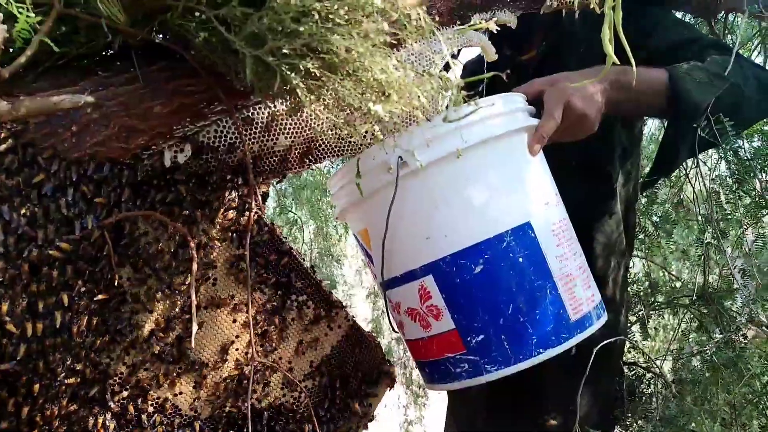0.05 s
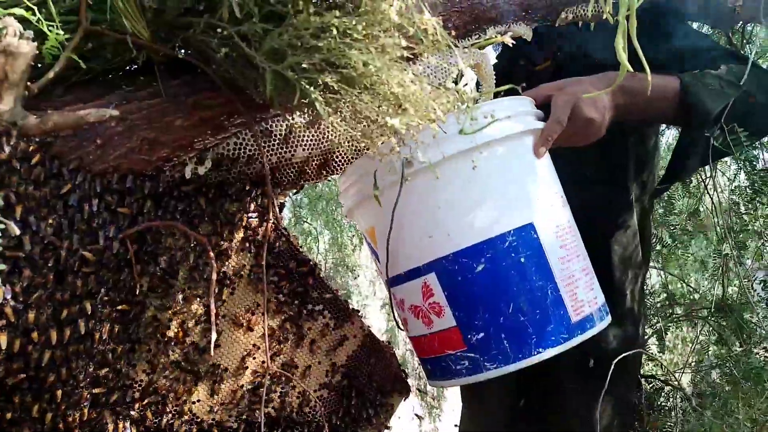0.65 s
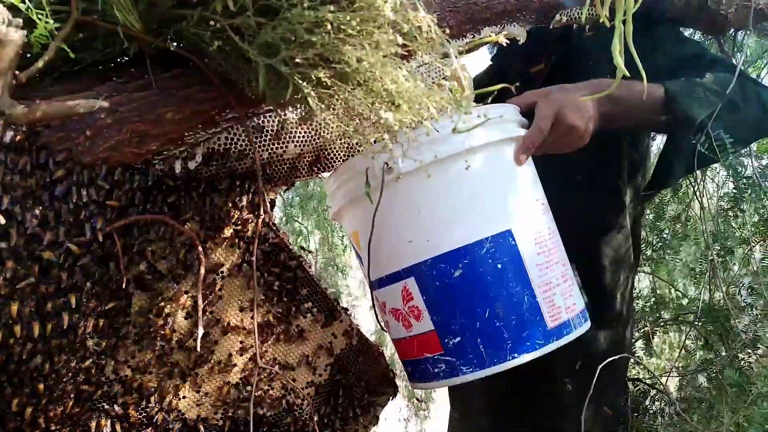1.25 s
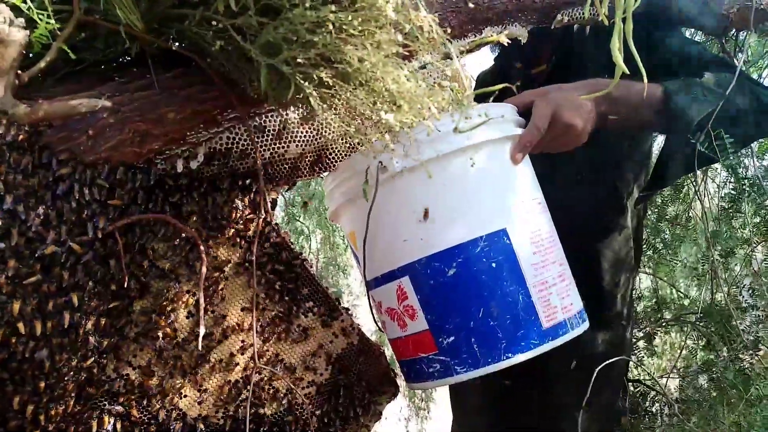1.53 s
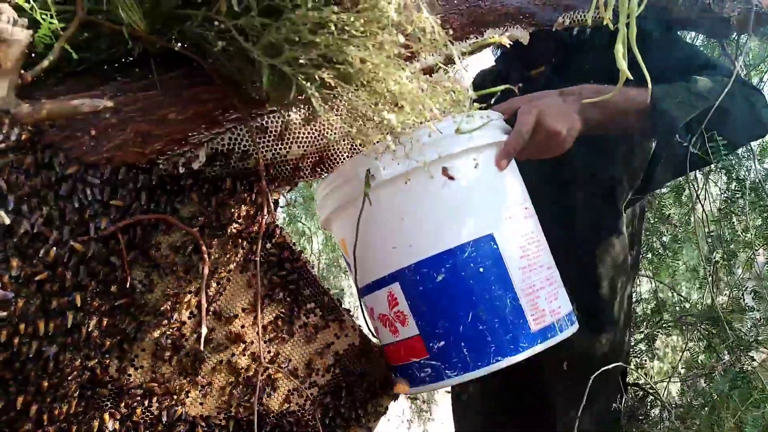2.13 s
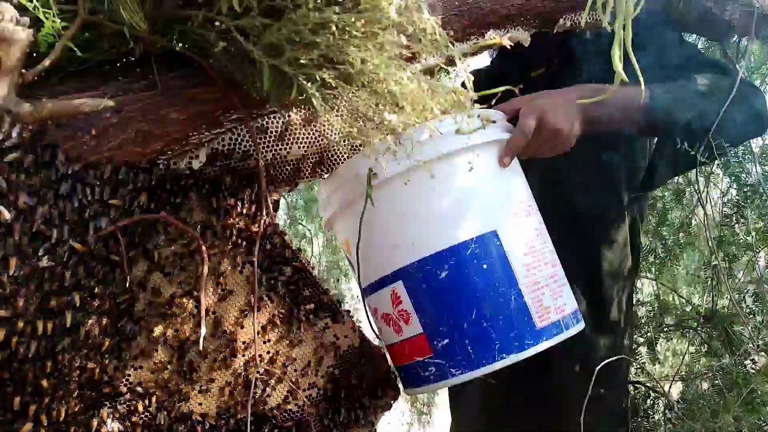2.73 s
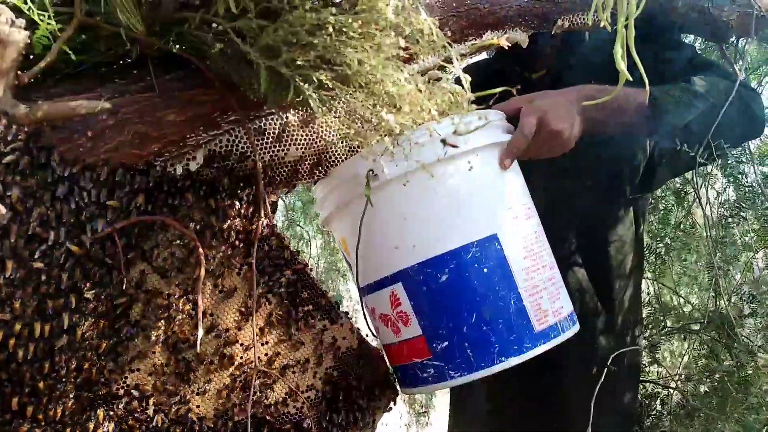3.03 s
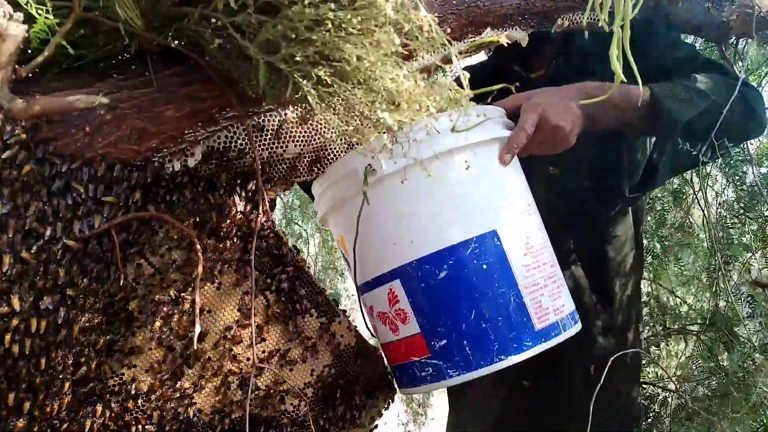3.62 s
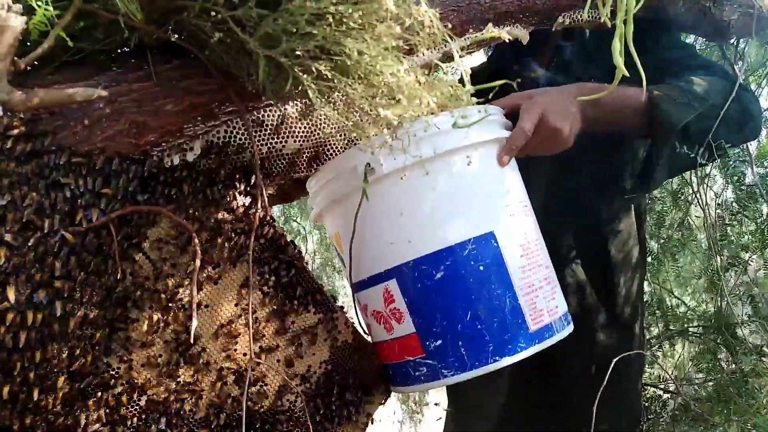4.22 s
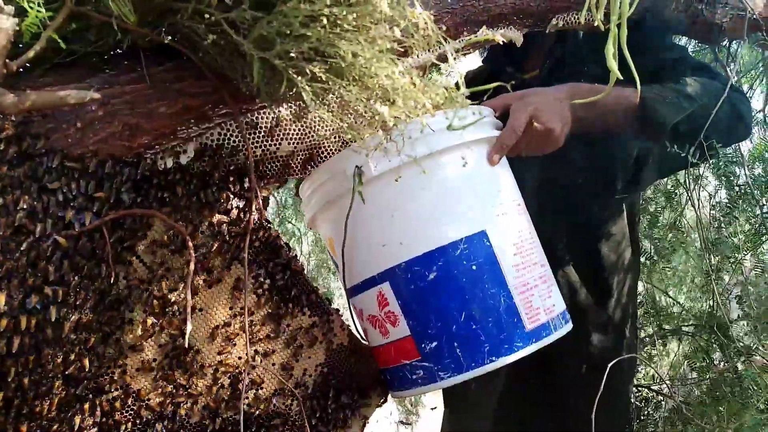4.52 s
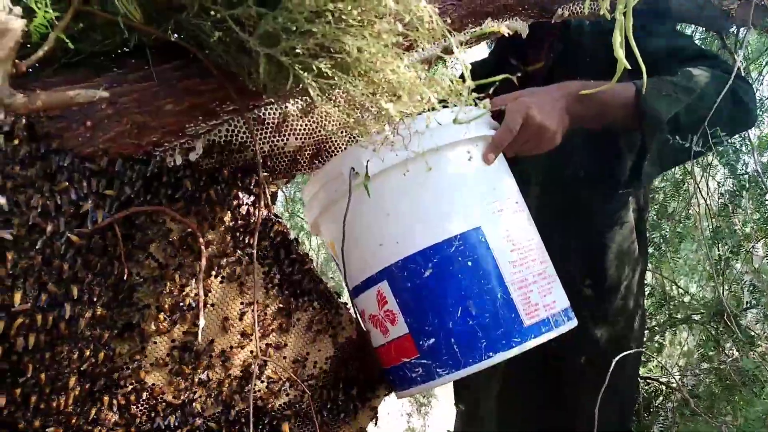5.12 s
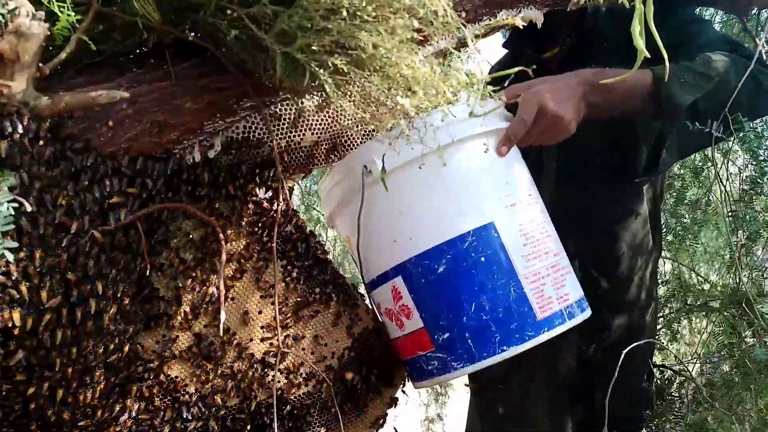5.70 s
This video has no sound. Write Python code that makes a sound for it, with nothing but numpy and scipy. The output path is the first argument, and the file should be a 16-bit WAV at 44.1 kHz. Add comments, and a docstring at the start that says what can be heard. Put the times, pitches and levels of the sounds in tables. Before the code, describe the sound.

Countless bees drone together near the microphone in the open air, a deep hum that fades back and then surges as the colony is stirred. Behind it are lumpy wind rumble on the microphone and a faint, ticking leafy hiss. Tiny twig cracks come now and then. Later a plastic bucket gives light scuffs and two soft knocks on a branch, and the hum eases while leaves rustle.

```python
"""Outdoors at a wild bee colony on a hanging comb, with a plastic bucket held up to it.
Countless wings merge into a low roar that surges and sinks as the bees are stirred.
Behind it, wind rumbles on the microphone, and leaves and crawling bees make a fine hiss.
Dry twigs snap now and then, and the bucket scuffs and knocks softly against the branch."""
import sys
import numpy as np
from scipy import signal
from scipy.fft import rfft, irfft, next_fast_len
from scipy.io import wavfile
from scipy.ndimage import uniform_filter1d, map_coordinates

SR = 44100
rng = np.random.default_rng(int(sys.argv[2]) if len(sys.argv) > 2 else 0)


def master_out(mix):
    """Clip the mix to full scale and print it as 16-bit PCM to the path in sys.argv[1]."""
    frames = np.transpose(np.atleast_2d(mix))
    ceiling = np.clip(frames, -1, 1)
    pcm = np.round(ceiling * 32767).astype(np.int16)
    wavfile.write(sys.argv[1], SR, pcm)


N = 258426

# how stirred the colony is, as the level of its hum: (time [s], level [dB])
COLONY_STIR = [(0, -44.5), (0.31, -44.5), (0.64, -50.5), (0.85, -60), (1.45, -57.5), (1.65, -57.5),
               (1.95, -53), (2.2, -51.5), (2.55, -52.5), (2.85, -55), (3.25, -50.5), (3.5, -45.5),
               (3.87, -45), (4.08, -39.5), (4.3, -41.5), (4.48, -44.5), (4.68, -42.5), (5.03, -42.5),
               (5.3, -50), (5.6, -51), (5.86, -49.5)]


def amp(db):
    """Decibels to gain."""
    return 10 ** (np.asarray(db) / 20)


def unit(x):
    """Scale to rms 1."""
    return x / np.sqrt(np.mean(x ** 2) + 1e-20)


def along(points, hz):
    """Read (frequency, value) points on a log frequency axis."""
    freqs, values = np.transpose(points)
    return np.interp(np.log(hz + 1), np.log(freqs + 1), values)


def fader(points):
    """Join (time, value) points into one value per sample."""
    times, values = np.transpose(points)
    return np.interp(np.arange(N) / SR, times, values)


def swell(middle_s, length_s):
    """A bell-shaped rise and fall with peak 1."""
    return np.exp(-(2 * (np.arange(N) / SR - middle_s) / length_s) ** 2)


def wobble(rate):
    """A smooth random curve, rate knots a second."""
    knots = rng.standard_normal(int(N * rate / SR) + 4)
    coarse = np.arange(0, N + 64, 64)
    return np.interp(np.arange(N), coarse, map_coordinates(knots, [coarse * rate / SR]))


def filtered(x, response):
    """Filter x by a gain given as a function of frequency."""
    n = x.shape[-1]
    padded = next_fast_len(n + 8192)
    return irfft(rfft(x, padded) * response(np.fft.rfftfreq(padded, 1 / SR)), padded)[..., :n]


def resonance(hz, centre, width):
    """A causal resonance with peak gain 1."""
    return 1j * hz * width / (centre ** 2 - hz ** 2 + 1j * hz * width)


def below(hz, edge_hz):
    """A steep low-pass gain."""
    return 1 / np.sqrt(1 + (hz / edge_hz) ** 16)


def panned(pan_db):
    """Stereo gains; pan is left minus right in dB."""
    return amp(np.array([[pan_db], [-pan_db]]) / 2)


def from_left(x, lead_s):
    """Sound from the left reaches the left microphone port first."""
    return filtered(x, lambda hz: np.exp(1j * np.pi * hz * lead_s * np.array([[1], [-1]])))


def add(out, start_s, sound):
    """Mix a sound in at its start time."""
    part = out[..., round(start_s * SR):][..., :sound.shape[-1]]
    part += sound[..., :part.shape[-1]]


def rush(spectrum, correlation, patchy_db):
    """Coloured stereo noise of rms 1, its gain mottled over time and frequency."""
    grid = signal.stft(rng.standard_normal((2, N)), nperseg=512)[2]
    patches = uniform_filter1d(rng.standard_normal(grid.shape[1:]), size=8, axis=0)
    patches = unit(uniform_filter1d(patches, size=12, axis=1))
    pair = signal.istft(grid * amp(patchy_db * patches), nperseg=512)[1][:, :N]
    spread = lambda hz: np.arccos(np.clip(along(correlation, hz), -1, 1)) / 2
    colour = lambda hz: amp(along(spectrum, hz)) * [np.cos(spread(hz)), np.sin(spread(hz))]
    mid, side = filtered(pair, colour)
    return unit(np.array([mid + side, mid - side]))


def breeze(wind_db, lumps_db, air_db):
    """Lumpy wind rumble, a little different at each port, over the steady murmur of open air."""
    # wind on the microphone: (frequency [Hz], level [dB])
    wind_spectrum = [(8, 3.5), (20, 1), (45, 1.5), (75, 5.5), (110, -7), (250, -47.5)]
    # puffs of wind: (middle [s], length [s], boost [dB])
    puffs = [(1.35, 0.14, 9.5), (1.8, 0.34, 2.5), (2.31, 0.13, 11), (2.52, 0.064, 13), (5.79, 0.1, 4)]
    # bed of open air: (frequency [Hz], level [dB])
    air_spectrum = [(30, -14), (70, -4.5), (140, -7), (250, -11.5), (450, -19.5), (700, -17), (1000, -23.5),
                    (1600, -30.5), (2500, -38.5), (5000, -94)]
    # its stereo image: (frequency [Hz], left-right correlation [0-1])
    air_correlation = [(25, 0.46), (120, 1), (250, 0.96), (450, 0.43), (700, 0.49), (1300, 0)]
    puff_db = sum(db * swell(middle, length) for middle, length, db in puffs)
    gusts = amp(wind_db + puff_db + lumps_db * wobble(3.2))
    wind = gusts * rush(wind_spectrum, correlation=[(20, 0.1), (50, 0.73), (90, 0.76)], patchy_db=4.0)
    air = amp(air_db) * rush(air_spectrum, air_correlation, patchy_db=1.8)
    return wind + from_left(air, lead_s=0.00018)


def rustle(ticks_per_s, tick_db, spread_db):
    """Leaves and crawling bees: a fluttering hiss with tiny ticks, swelling where foliage brushes by."""
    # the bed, nearly steady until the foliage is disturbed: (time [s], relative level [dB])
    bed_levels = [(0, -67), (0.8, -65.5), (1.8, -67), (5.2, -67), (5.5, -62), (5.86, -61.5)]
    # colour of hiss and ticks: (frequency [Hz], level [dB])
    spectrum = [(800, -10), (1400, 0.5), (2000, 0), (3000, -3), (4600, -5), (5700, -4.5), (6600, -0.5),
                (7400, 2), (8300, -8), (9300, -14.5), (11000, -12), (13000, -6.5), (14400, -12)]
    # foliage brushing the bucket: (middle [s], length [s], level [dB])
    brushes = [(0.03, 0.089, -55.5), (1.007, 0.065, -63), (1.157, 0.031, -65), (4.702, 0.026, -60),
               (5.06, 0.019, -65), (5.197, 0.022, -59), (5.395, 0.1, -58), (5.64, 0.08, -58.5)]
    brushing = sum(amp(db) * swell(middle, length) for middle, length, db in brushes)
    envelope = np.hypot(amp(fader(bed_levels) + 3.5), brushing)
    hiss = rush(spectrum, correlation=[(1500, 0.068), (7000, 0), (14000, 0)], patchy_db=1.12)
    flutter = amp(0.75 * wobble(18))
    triggers = (rng.random(N) < ticks_per_s / SR) * amp(spread_db * rng.random(N))
    tick_decay = amp(-60 * np.arange(SR // 20) / SR / 0.016)
    bursts = signal.fftconvolve(triggers, tick_decay)[:N] * rng.standard_normal((2, N))
    ticks = unit(filtered(bursts, lambda hz: amp(along(spectrum, hz))))
    return envelope * (flutter * hiss + amp(tick_db) * ticks)


def twigs(crack_t60, gain_db, tail_t60, tail_db, ring_t60):
    """A twig cracks and rings briefly; close echoes repeat both, and foliage scatters a faint tail."""
    # dry twigs breaking:
    # (time [s], relative level [dB], tilt [dB/octave], ring [Hz], ring over crack [dB], pan [dB])
    snaps = [(1.334, -47, 14, 9800, -14, -1), (1.3377, -44, -13, 3080, -2.5, 2),
             (1.5207, -38.5, 7, 5170, -8.5, 1), (3.3384, -43, 3, 3080, -6, 0),
             (3.92, -26.5, -4, 7320, -2.5, 2), (5.214, -34.5, 22, 12160, -14, 2),
             (5.2168, -43, 19, 13600, -12, 3)]
    # colour of a crack: (frequency [Hz], level [dB])
    spectrum = [(1000, -33), (2000, -22), (3300, -7.5), (5000, -7.5), (6200, 2.5), (7700, 1), (9000, -17),
                (11200, -10.5), (14500, -26.5)]
    # reflections off trunk and bucket: (delay [s], level [dB])
    echoes = [(.0028, -12.5), (.0047, -17), (.0083, -14), (0.017, -17)]
    out, t = np.zeros((2, N)), np.arange(SR // 15) / SR
    paths = [(0.00075, 0)] + echoes  # direct sound first
    echoed = lambda t60: sum((t >= delay) * amp(db - 60 * abs(t - delay) / t60) for delay, db in paths)
    envelope = echoed(crack_t60) + amp(tail_db - 60 * t / tail_t60)
    for start, db, tilt_db, ring_hz, ring_db, pan_db in snaps:
        colour = lambda hz: amp(along(spectrum, hz) + tilt_db * np.log2(hz / 7000 + 0.01))
        crack = unit(filtered(rng.standard_normal((2, len(t))) * envelope, colour))
        ring = unit(echoed(ring_t60) * np.sin(2 * np.pi * ring_hz * t))
        add(out, start, amp(db + gain_db) * panned(pan_db) * (crack + amp(ring_db) * ring))
    return out


def bucket_scuffs(gain_db, attack_s):
    """Soft contacts stir the plastic wall, so damped that its resonance is broad and has no pitch."""
    # scuffing contacts: (time [s], relative level [dB], centre [Hz], t60 [s], pan [dB])
    contacts = [(1.34, -57, 2900, 0.025, 2), (1.393, -61, 1700, 0.027, -7), (3.504, -62, 2600, 0.11, 2),
                (3.545, -59.5, 1700, 0.1, 2), (3.907, -44.5, 1530, 0.022, -1), (3.96, -70, 1390, 1.2, 2),
                (4.576, -55.5, 1450, 0.14, 6), (4.775, -61.5, 2100, 0.045, 0), (5.055, -67, 1450, 0.8, -1),
                (5.180, -65, 2070, 0.037, -14), (5.192, -49.5, 1770, 0.028, 1),
                (5.227, -51, 1670, 0.032, -5), (5.238, -52, 1020, 0.045, 2)]
    out, t = np.zeros((2, N)), np.arange(SR // 2) / SR
    for start, db, centre, t60, pan_db in contacts:
        wall = lambda hz: resonance(hz, centre, centre / 2) / np.hypot(1, hz / (2 * centre))
        friction = rng.standard_normal(len(t)) + rng.standard_normal((2, len(t)))
        envelope = amp(db + gain_db - 60 * t / t60) * (1 - np.exp(-t / attack_s))
        add(out, start, envelope * panned(pan_db) * unit(filtered(friction, wall)))
    return out


def bucket_knocks(attack_s):
    """A firmer contact rings the modes of the bucket wall, a little differently each time."""
    # bucket hitting the branch: (time [s], level [dB], pan [dB])
    hits = [(4.5815, -48, 9), (4.585, -51, 11), (5.2385, -49.5, 0), (5.2443, -52, 4)]
    # modes of the plastic wall: (frequency [Hz], relative level [dB], t60 [s])
    modes = [(666, 3, .035), (1063, -2.5, 0.068), (1420, -1, .03), (2100, -6, 0.016), (2850, -13, 0.014),
             (3880, -12, .012)]
    out, t = np.zeros((2, N)), np.arange(SR // 10) / SR
    for start, db, pan_db in hits:
        ring = np.zeros(len(t))
        for hz, mode_db, t60 in modes:
            decay = amp(mode_db + rng.normal(0, 1.6) - 60 * t / t60)
            ring += decay * np.sin(2 * np.pi * hz * rng.normal(1, 0.014) * t)
        add(out, start, amp(db) * (1 - np.exp(-t / attack_s)) * panned(pan_db) * ring)
    return out


def near_bees(wing_hz, level_db, tilt_db_per_octave, count):
    """The nearest bees, each a stack of harmonics on a wavering wing rate, swell with the colony."""
    out = np.zeros((2, N))
    for _ in range(count):
        pitch = wing_hz * np.exp(0.12 * wobble(2) + 0.025 * wobble(17))
        phase = 2 * np.pi * np.cumsum(pitch) / SR
        buzz = sum(amp(tilt_db_per_octave * np.log2(k)) * np.sin(k * phase) for k in range(1, 5))
        out += panned(rng.normal(0, 1.2)) * amp(7.6 * wobble(2.467)) * buzz
    return amp(level_db) * unit(amp(fader(COLONY_STIR)) * out)


def drone_core(waver, swing_db):
    """Deep tones hold firm inside the roar, wavering too quickly to give a clear pitch."""
    # weight of the low core: (time [s], level [dB])
    levels = [(0, -63), (1.2, -59), (2.2, -49), (3.2, -63), (3.5, -45), (4.1, -37.5), (4.4, -44),
              (5.05, -40.5), (5.3, -42), (5.6, -51), (5.86, -46)]
    # its tones: (frequency [Hz], relative level [dB])
    tones = [(95, -3), (159, -3)]
    out = np.zeros(N)
    for hz, db in tones:
        pitch = hz * np.exp(waver * (wobble(7) + wobble(45)))
        tone = unit(np.sin(2 * np.pi * np.cumsum(pitch) / SR))
        out += amp(db + swing_db * wobble(14)) * tone
    return amp(fader(levels)) * out


def roar_flares(relative_width, edge_hz):
    """Brief surges of the roar, each a band of noise crowded around its own pitch."""
    # hum or buzz flaring up: (middle [s], length [s], level [dB], centre [Hz])
    surges = [(0.21, 0.2, -50, 438), (0.223, 0.091, -48, 604), (0.344, 0.11, -47, 159),
              (1.665, 0.12, -49, 159), (1.65, 0.14, -58.5, 584), (2.152, 0.13, -48, 163),
              (2.2, 0.14, -50, 249), (3.16, 0.44, -60, 448), (3.472, 0.064, -41.5, 159),
              (3.522, 0.065, -57, 490), (4.04, 0.17, -52, 444), (4.222, 0.11, -43.5, 242),
              (4.328, 0.067, -44.5, 419), (4.917, 0.09, -47, 454), (5.06, 0.15, -40, 174),
              (5.813, 0.041, -60, 537)]
    out = np.zeros(N)
    for middle, length, db, centre in surges:
        band = lambda hz: resonance(hz, centre, relative_width * centre) ** 2 * below(hz, edge_hz)
        envelope = amp(db) * np.sqrt(swell(middle, length))
        out += envelope * unit(filtered(rng.standard_normal(N), band))
    return out


def colony_roar(stirred_db, drone_db, drone_follow, buzz_db, buzz_follow):
    """Thousands of wing beats blur into a roar; its drone, hum and buzz rise as the bees are stirred."""
    # massed wings: (frequency [Hz], level [dB])
    spectrum = [(30, -38), (55, 0), (90, -1.5), (122, -2), (160, 1), (250, -7.5), (350, -18), (460, -24),
                (620, -27.5), (800, -41.5), (1100, -41.5), (2000, -78)]
    # their stereo image: (frequency [Hz], left-right correlation [0-1])
    correlation = [(60, 0.99), (200, 0.92), (500, 0.89), (700, 0.5), (1200, 0.25)]
    # broad humps and a dip in the roar: (centre [Hz], width [Hz], gain [dB])
    humps = [(87.8, 14, 4), (145, 47, 4.5), (240.4, 28, -3), (433, 64, 4)]
    # slow drift of the bass: (time [s], gain [dB])
    bass_drift = [(0, -2.5), (0.22, -7), (0.5, -4.5), (0.8, -6), (1.3, -3), (1.7, -1.5), (2.2, -5),
                  (3.2, -5), (3.55, -2), (4.1, -1), (4.8, -2), (5.3, 0.5), (5.86, 1.5)]
    eq = lambda hz: amp(sum(db / (1 + (2 * (hz - centre) / width) ** 2) for centre, width, db in humps))
    roar = filtered(rush(spectrum, correlation, patchy_db=1.5), eq)
    drone = unit(filtered(roar, lambda hz: below(hz, 162.6)))
    hum = unit(filtered(roar, lambda hz: below(hz, 366.5) - below(hz, 188.7)))
    buzz = unit(filtered(roar, lambda hz: 1 - below(hz, 388)))
    hum_db = fader(COLONY_STIR)
    stir_db = hum_db - stirred_db  # 0 when the colony is fully stirred
    drone_gain = amp(drone_db + drone_follow * stir_db + fader(bass_drift))
    buzz_gain = amp(buzz_db + buzz_follow * stir_db)
    return drone_gain * drone + amp(hum_db) * hum + buzz_gain * buzz


def scene():
    """The colony hangs to the left; air and small handling sounds are all around."""
    bees = colony_roar(stirred_db=-42.5, drone_db=-38.5, drone_follow=0.86,
                       buzz_db=-54.5, buzz_follow=0.81)
    bees += roar_flares(relative_width=0.36, edge_hz=760)
    bees += drone_core(waver=0.07, swing_db=2.0)
    bees += near_bees(wing_hz=215.4, level_db=-58.0, tilt_db_per_octave=-8.0, count=5)
    air = breeze(wind_db=-54, lumps_db=-0.8, air_db=-53)
    leaves = rustle(ticks_per_s=56, tick_db=-8.5, spread_db=1.0)
    snaps = twigs(crack_t60=0.0018, gain_db=-23.5, tail_t60=0.073, tail_db=-21.5, ring_t60=0.0056)
    bucket = bucket_scuffs(gain_db=4.0, attack_s=0.0024) + bucket_knocks(attack_s=0.0012)
    return air + leaves + snaps + bucket + from_left(bees, lead_s=0.00041)


def record(dry):
    """Each microphone port has its own colour; nothing passes above the band limit."""
    # imbalance of the two ports: (frequency [Hz], left minus right [dB])
    imbalance = [(30, 14.5), (70, 0), (350, 2), (700, -0.5), (1300, -3), (2400, -2), (4500, 0.5),
                 (7000, -2.5), (10000, -7.5), (14000, -7)]
    colour = lambda hz: amp(np.array([[0.5], [-0.5]]) * along(imbalance, hz))
    return filtered(dry, lambda hz: colour(hz) * (hz < 14450))


dry = scene()
out = record(dry)
master_out(out)
```